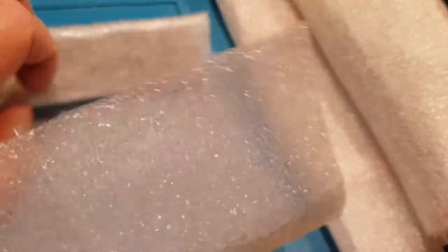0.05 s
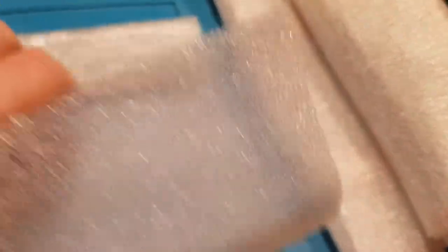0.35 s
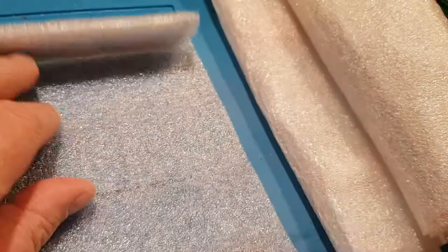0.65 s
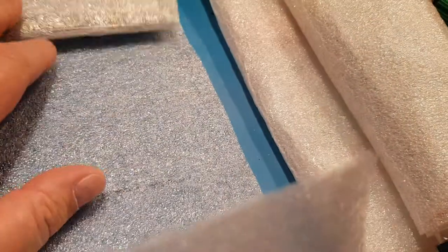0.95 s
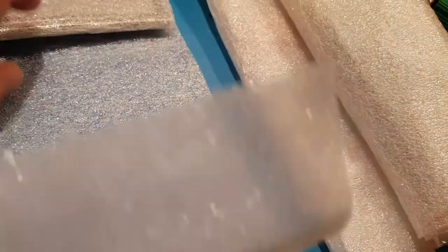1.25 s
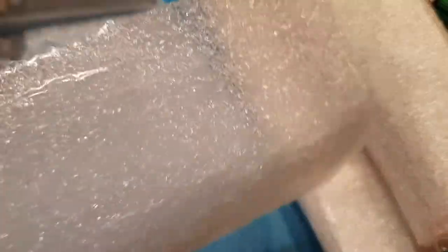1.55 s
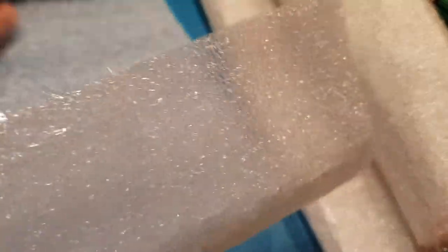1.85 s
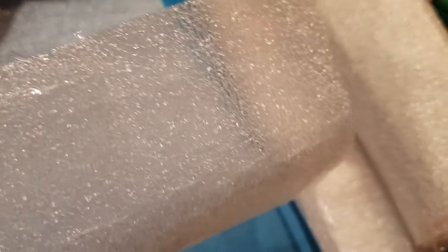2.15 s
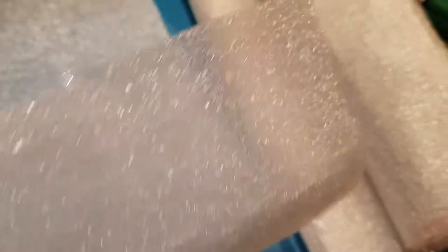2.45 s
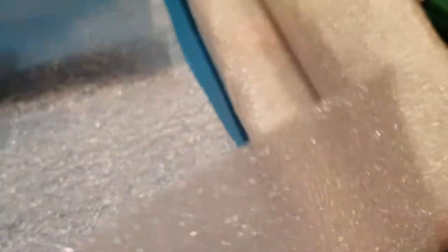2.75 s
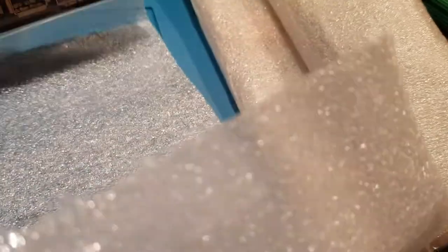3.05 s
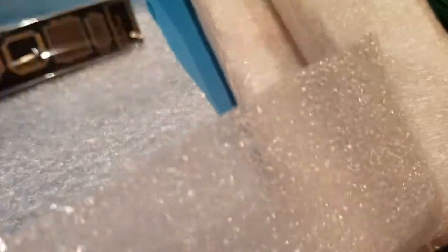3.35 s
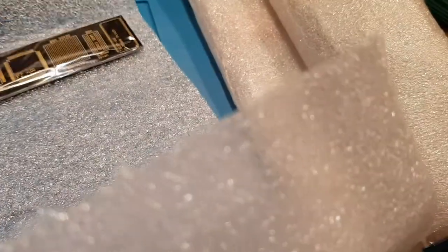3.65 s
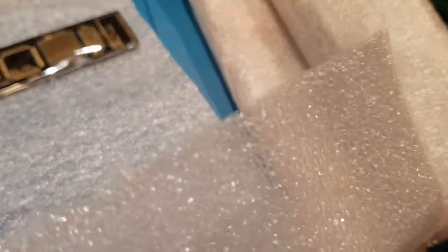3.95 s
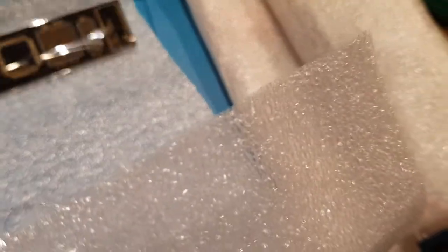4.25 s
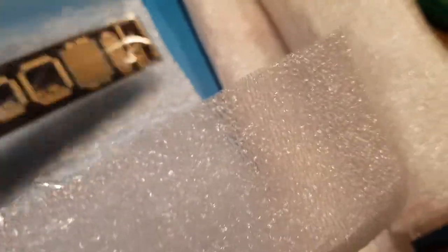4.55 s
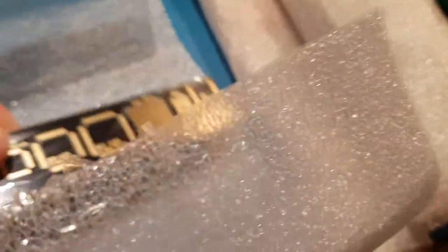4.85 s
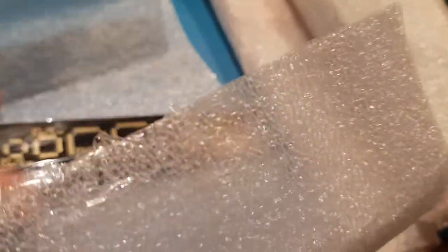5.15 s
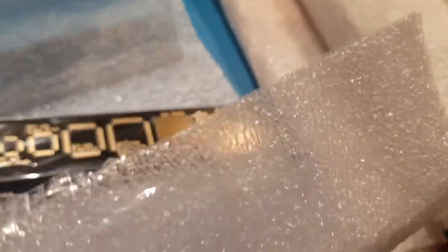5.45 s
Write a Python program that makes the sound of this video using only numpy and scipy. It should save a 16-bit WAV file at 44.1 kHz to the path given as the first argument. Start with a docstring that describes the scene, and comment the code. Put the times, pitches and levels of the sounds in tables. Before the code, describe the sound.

Thin foam packing sheets rustle, crinkle and snap close by as hands unwrap something, with soft bumps on a plastic box.

```python
"""A small quiet room, a two-port stereo microphone close to a plastic box. Hands slide thin foam sleeves
apart in it and lift out a wrapped circuit strip. From the start, foam cells catch and slip in strokes
of fine hiss while the sheets flex and squeak. A crease snaps sharply at 1 s. From 3.1 to 3.6 s the folds
scrunch hardest and soft bumps set the box booming. After a lull near 4.7 s come the last short strokes
and snaps, mostly on the left."""
import sys
import numpy as np
from scipy import signal
from scipy.fft import rfft, irfft, next_fast_len
from scipy.io import wavfile

SR = 44100
rng = np.random.default_rng(int(sys.argv[2]) if len(sys.argv) > 2 else 0)


def store_wav(level_fs):
    """Save 16-bit WAV to argv[1]."""
    pcm = np.round(np.clip(np.atleast_2d(level_fs), -1, 1) * 32767)
    wavfile.write(sys.argv[1], SR, pcm.T.astype(np.int16))


N = 251799
TIME = np.arange(N) / SR


# strokes of foam over foam: start/s, length/s, hiss/dB, top octave against the hiss/dB, flutter/dB
FOAM_STROKES = [(-0.01, 0.16, -47.5, -0.5, -58), (0.295, 0.14, -47.5, -0.5, -60),
                (0.502, 0.12, -47, -1, -62), (0.933, 0.077, -50.5, -6, -53.5),
                (1.108, 0.045, -46.5, 9, -68), (1.154, 0.159, -47, 2.5, -59),
                (1.397, 0.11, -47.5, -7, -56.5), (1.54, 0.078, -53.5, -1.0, -59),
                (1.696, 0.12, -51.5, 0.5, -53), (1.854, 0.039, -46, -0.5, -57.5),
                (1.941, 0.14, -46.5, 1, -60), (2.139, 0.077, -47.5, -3, -56),
                (2.243, 0.057, -50.5, -2, -45.5), (2.322, 0.15, -52.5, 2.5, -59.5),
                (2.477, 0.076, -54.5, 1, -58.5), (2.6, 0.079, -48.5, -4, -50), (2.716, 0.16, -53, 1, -61.5),
                (2.97, 0.19, -45, -2.5, -50.5), (3.189, 0.13, -44, -7, -51.5),
                (3.267, 0.22, -51.5, -10, -53.5), (3.506, 0.065, -59, 3, -53),
                (3.621, 0.03, -50.5, 0.5, -61), (3.708, 0.023, -49.5, 3, -55), (3.779, 0.13, -54, 4, -65),
                (3.962, 0.1, -51, 4, -67), (4.052, 0.066, -50, -3, -60), (4.145, 0.22, -54, 2, -58.5),
                (4.272, 0.11, -47.5, -13, -47.5), (4.492, 0.046, -63, 3.5, -66.5),
                (4.892, 0.028, -54, 8, -84), (4.946, 0.057, -55.5, 7, -86), (5.043, 0.022, -37, -1.5, -61),
                (5.131, 0.027, -51.5, 10, -80), (5.278, 0.11, -42.5, -5, -75),
                (5.419, 0.053, -50, 4.5, -61.5), (5.51, 0.061, -50.5, 2, -65), (5.645, 0.1, -59.5, 8, -61)]
# resting foam creeping between the strokes: t/s, hiss/dB
FOAM_CREEP = [(0.0, -51), (0.19, -59), (0.3, -54.5), (0.7, -53), (1.38, -52.5), (1.67, -60), (2.1, -57.5),
              (2.9, -54), (3.5, -52), (3.68, -66), (4.42, -61), (4.49, -73.5), (4.68, -66.5), (4.78, -78),
              (4.9, -56), (5.25, -57), (5.49, -66), (5.63, -68)]
def stroke_gains():
    """The strokes add their power to the creep: gains of hiss, finest cells and flutter."""
    hiss = fine = from_db(in_time(FOAM_CREEP)) ** 2
    flutter = 0
    for start, length, hiss_db, top_db, flutter_db in FOAM_STROKES:
        power = gesture(start, length)
        hiss = hiss + power * from_db(hiss_db) ** 2
        fine = fine + power * from_db(hiss_db + top_db) ** 2
        flutter = flutter + power * from_db(flutter_db) ** 2
    return np.sqrt([hiss, fine, flutter])


# spectrum of slipping cells, close up: f/Hz, level/dB
HISS_SPECTRUM = [(250, -46), (1000, -15), (1700, -12.5), (2400, -5), (3100, -5.5), (4300, 2), (5200, 1),
                 (6100, 1), (7300, 0), (9000, -3), (12000, 2), (14000, -2), (16000, -5.5)]
# where the rubbing sits in front of the microphone: t/s, left-right/dB
RUB_PLACE = [(0, 1), (1.0, 1.5), (1.18, 2), (1.4, 0), (2.4, 1.5), (3.1, 2.5), (3.9, 3), (4.35, 2.5),
             (4.55, 6.5), (4.85, 3.5), (5.25, 2.5), (5.71, 1)]
def sliding(hiss_gain, fine_gain):
    """Foam on foam: countless cells slip in a fine hiss, and now and then one ticks out of it."""
    cells = slips(per_s=6000, spread_db=2.5, life_s=.001, alike=.3)
    ticks = from_db(-12.5) * slips(per_s=150, spread_db=3.8, life_s=.0004, alike=.5)
    rubbing = near_wall(coloured(cells + ticks, HISS_SPECTRUM), share=.5, lag_s=.0008, sway=.25)
    coarse, fine = treble_split(patchy(rubbing, depth_db=2.5, rate=31))
    grip = from_db(1.5 * drift(9.2))  # the foam's hold wavers at random
    return (coarse * hiss_gain + fine * fine_gain) * grip * panned(in_time(RUB_PLACE))


# spectra of a rasping fold and of the flapping sheet: f/Hz, level/dB
RASP_SPECTRUM = [(200, -59), (900, -22), (1600, -11), (2700, 1.5), (4300, 4.5), (5400, 4.5), (6050, 4),
                 (7000, 2), (9300, 1.5), (11500, 7), (14500, 4.5), (16000, -20)]
FLAP_SPECTRUM = [(60, -32), (250, -6), (450, -5), (800, 4), (1200, 9), (1700, 1.5), (2600, -7.5),
                 (5000, -16)]
# crushed folds: peak t/s, rasp/dB, top octave against the rest/dB, flap/dB, fade/s, left-right/dB
CRUSHED_FOLDS = [(0.067, -46.5, 5, -49, 0.0049, 3), (0.13, -37.5, -6, -45.5, 0.0084, -2.5),
                 (0.32, -50, -3, -58, 0.014, 6), (0.572, -42.5, -11, -57, 0.017, 8.5),
                 (1.561, -45.5, 0, -46.5, 0.014, -1.5), (1.769, -50, 8, -45, 0.003, 15),
                 (1.816, -35.5, -6, -55, 0.0086, 1), (1.903, -43, 2, -50, 0.0041, 3),
                 (2.353, -38, -5, -44, 0.0045, -1), (2.959, -41, -22, -63, 0.012, -1),
                 (3.107, -29.5, -9, -40, 0.0071, 3.5), (3.338, -30.5, 5, -42, 0.003, 2.5),
                 (3.378, -28.5, -9, -35.5, 0.0051, 1), (3.403, -32.5, -10, -38, 0.0049, 6),
                 (3.417, -35, -10, -57, 0.0019, 13), (3.424, -33.5, -7.5, -40, 0.014, 0.5),
                 (3.578, -28, -7.5, -41.5, 0.0066, 5), (3.652, -48, -8, -65.5, 0.015, 4),
                 (3.744, -38.5, 3, -54, 0.0061, 3), (3.793, -49, -12, -47, 0.014, -1),
                 (4.032, -37, -4, -72, 0.0052, -5), (4.302, -45.5, 17, -66, 0.0057, 6),
                 (4.612, -57, -1, -69.5, 0.021, 7), (5.06, -46.5, 16, -70, 0.0087, 2.5)]
def scrunches(swell_s=.0027):
    """A fold gives way: slips crowd together, swell and die, and the sheet flaps."""
    fold_slips = slips(per_s=1700, spread_db=3.5, life_s=.00039, alike=.12)
    rasp, top = treble_split(coloured(fold_slips, RASP_SPECTRUM))
    flap = coloured(slips(per_s=1200, spread_db=2.2, life_s=.001, alike=.5), FLAP_SPECTRUM)
    out = np.zeros((2, N))
    for s, rasp_db, top_db, flap_db, fade_s, pan_db in CRUSHED_FOLDS:
        near = np.abs(TIME - s) < .15
        t = TIME[near] - s
        shape = np.exp(np.minimum(t / swell_s, -t / fade_s))
        grit = from_db(rasp_db) * (rasp[:, near] + from_db(top_db) * top[:, near])
        out[:, near] += shape * panned(pan_db) * (grit + from_db(flap_db) * flap[:, near])
    return out


# snapping creases: t/s, crack over 4 ms/dB, panel f/Hz, panel over 4 ms/dB, left-right/dB
CREASES = [(0.024, -52, 5430, -43, -7), (0.054, -40.5, 5770, -45, 0), (0.517, -43, 6200, -58, 2),
           (0.991, -25.5, 2730, -27.5, 0), (1.283, -51, 4650, -53, 1), (1.3, -56, 5210, -42, 1),
           (1.426, -36, 6380, -42.5, 5), (1.486, -37, 6260, -47, -2), (1.548, -42, 4460, -41, 2),
           (1.565, -46, 5260, -40.5, 9), (1.688, -50, 5020, -39.5, -3), (1.734, -38, 3880, -48, 1),
           (1.751, -29.5, 3720, -37.5, -1), (1.767, -41, 5200, -37, 5), (2.196, -40, 5150, -43, 1),
           (2.252, -37.5, 4010, -56, 3), (2.267, -48, 4570, -45, 6), (2.618, -37, 4300, -46, 1),
           (2.625, -44, 5630, -39.5, 1), (2.837, -55, 3500, -40, -3), (3.336, -38, 5330, -49, 6),
           (3.372, -33, 3700, -38, 5), (3.457, -37, 6120, -46, 0), (3.838, -34, 4600, -49, 5),
           (4.024, -42, 5600, -43, 8), (4.194, -44, 4500, -61, 1), (4.303, -35.5, 3830, -48, 9),
           (4.614, -45, 5000, -59, 3), (4.639, -50, 6500, -53, 3), (4.686, -52, 4700, -79, 11),
           (4.814, -56, 6500, -63, 10), (4.842, -45, 5370, -51.5, 6.5), (5.003, -33.5, 5450, -33.5, 6),
           (5.367, -42, 6030, -48, 9), (5.381, -32, 5500, -41, 6), (5.46, -31, 6100, -54, 10.5),
           (5.52, -48, 6300, -58, 8), (5.646, -39.5, 2830, -50.5, 4), (5.662, -37, 6200, -65, 15),
           (5.678, -34.5, 2820, -43.5, 7)]
def snaps(crack_s=.00034, scatter_s=.005, scatter_db=-21, kick_s=.0001, t60=.0076):
    """A crease flips: a dry crack, scattered by the layers around it, and the freed panel rings."""
    size = 2048
    t, out = TIME[:size], np.zeros((2, N + size))
    over_4_ms = np.sqrt(.004 * SR / size)
    shape = t / crack_s * np.exp(1 - t / crack_s) + from_db(scatter_db) * np.exp(-t / scatter_s)
    push = np.exp(-t / kick_s) + from_db(-26) * np.exp(-t / .01)
    for s, crack_db, hz, panel_db, pan_db in CREASES:
        crack = cut(rng.standard_normal((2, size)) * shape, 5000, "high")
        crack = from_db(crack_db) * np.array([rms_one(port) for port in crack])
        kick = rng.standard_normal(size) * push
        kick[0] += 3  # the flip itself, followed by the smaller slips it sets off
        # the panel has two close modes and a weaker overtone
        modes = ring(kick, hz, t60) - .61 * ring(kick, hz * .79, t60) - .48 * ring(kick, hz * 1.605, t60)
        panel = from_db(panel_db) * rms_one(cut(modes, 1700, "high"))
        at = int(s * SR)
        out[:, at:at + size] += crack * panned(pan_db) + panel * panned(pan_db / 2)
    return over_4_ms * out[:, :N]


# modes of the plastic box: f/Hz, relative level/dB, t60/s
BOX_MODES = [(67, -43, 0.091), (121.4, 0.5, 0.082), (145, -3, 0.27), (183.7, -8.5, 0.35),
             (215, -4.5, 0.083), (252.5, -8.5, 0.15), (301.8, -19.5, 0.52), (401, -8.5, 0.057)]
# soft bumps on the box: t/s, boom drive/dB, knock drive/dB
BOX_BUMPS = [(0.130, -42, -57), (0.315, -48, -59), (0.352, -45, -72), (0.392, -49, -72), (1.565, -52, -63),
             (1.814, -50, -39), (2.09, -50, -60), (2.422, -48, -48), (2.614, -49, -66), (3.268, -48, -56),
             (3.339, -36, -46), (3.368, -38, -46), (3.401, -43, -41), (3.425, -46, -46), (3.738, -42, -60),
             (3.788, -54, -49), (4.801, -56, -61), (4.920, -43, -55), (5.053, -43, -62), (5.688, -51, -56)]
def bumps(push_s=.002, knock_s=.0092, wall_hz=390, wall_t60=.043):
    """Padded blows ring each mode of the box with its own strength, under a dull knock of the wall."""
    times, boom_db, knock_db = np.transpose(BOX_BUMPS)
    at = (times * SR).astype(int)
    boom, force = np.zeros(N), np.zeros(N)
    for hz, mode_db, t60 in BOX_MODES:
        blow_db = boom_db + mode_db + rng.normal(-2, 1, len(at))
        blows = np.zeros(N)
        blows[at] = from_db(blow_db) * rng.choice([-1, 1], len(at))
        boom += ring(blows, hz, t60)
    force[at] = from_db(knock_db)
    wall = from_db(2) * ring(force, wall_hz, wall_t60)
    contact = signal.lfilter([1], [1, -np.exp(-1 / (knock_s * SR))], force + 1e-18)
    dull_noise = cut(cut(stereo_noise(alike=.12), 940, "low"), 200, "high")
    body = cut(boom, 1 / push_s, "low") + wall
    return cut(body, 81, "high") + contact * rms_one(dull_noise)  # a small box radiates little deep bass


# resonances driven by the rubbing: taut patches of foam that squeak, the hollow box humming near 434 Hz at
# 0.869 s and 4.099 s, and a brief flap of a sheet at 1.768 s: peak t/s, f/Hz, bandwidth/Hz, level/dB, half
# length/s
RUBBED_RESONANCES = [(0.063, 920, 200, -60, 0.022), (0.404, 4360, 400, -48, 0.021), (0.869, 433, 40, -71, 0.08),
                     (1.002, 2500, 900, -48, .018), (1.222, 1740, 600, -55, 0.1), (1.48, 1033, 222, -50, 0.025),
                     (1.768, 1100, 880, -45, 0.0041), (2.046, 1280, 402, -55, 0.069),
                     (2.276, 1100, 500, -47, 0.015), (2.353, 3000, 900, -45, 0.011),
                     (2.66, 1900, 400, -49.5, 0.018), (2.84, 3380, 400, -50, 0.011),
                     (3.052, 830, 250, -53, 0.027), (3.105, 5830, 383, -34.5, 0.014),
                     (3.454, 5900, 500, -50, 0.015), (4.099, 435, 40, -63.5, 0.051),
                     (4.352, 520, 160, -57.5, 0.039), (5.002, 5930, 1200, -41, 0.015)]
def squeaks():
    """Slips drive one resonance, of a foam patch, the hollow box or a flapping sheet, while the rub swells and
    fades."""
    out, size = np.zeros((2, N)), 8192
    for s, hz, width_hz, level_db, half_s in RUBBED_RESONANCES:
        start = max(int(s * SR) - size // 2, 0)
        t = TIME[start:start + size] - s
        band = signal.butter(2, [hz - width_hz / 2, hz + width_hz / 2], "band", fs=SR, output="sos")
        tones = signal.sosfilt(band, rng.standard_normal((3, size)))
        squeak = rms_one(tones[0] + .5 * tones[1:])  # one part shared, one for each port
        out[:, start:start + size] += from_db(level_db) * np.exp(-(t / half_s) ** 2) * squeak
    return out


# spectrum of a fluttering sheet: f/Hz, level/dB
FLUTTER_SPECTRUM = [(150, -25), (500, -15), (900, -4), (1300, -0.5), (1800, -0.5), (2400, -3), (3200, -2.5),
                    (5000, -7.5)]
def fluttering(gain):
    """Whole sheets bend and flutter in coarser slips, next to the wall of the box."""
    flutter = coloured(slips(per_s=700, spread_db=4, life_s=.0033, alike=.25), FLUTTER_SPECTRUM)
    reflected = near_wall(flutter, share=.6, lag_s=.0015, sway=.3)
    return gain * patchy(reflected, depth_db=3, rate=15)


# spectrum of a dragging finger: f/Hz, level/dB
DRAG_SPECTRUM = [(70, -24), (220, -11.5), (400, -2.5), (600, -4), (800, -4), (1100, -16), (2000, -50)]
# finger drags: start/s, length/s, level/dB
FINGER_DRAGS = [(0.0, 0.15, -78), (0.934, 0.11, -71.5), (1.423, .17, -63.5), (1.72, 0.18, -62),
                (1.977, 0.77, -72.5), (2.608, .09, -62), (2.931, 0.19, -58), (3.253, 0.19, -54.5),
                (3.483, 0.1, -63), (3.707, 0.025, -59), (3.768, 0.04, -52), (3.856, 0.046, -64),
                (3.977, 0.2, -65), (4.285, 0.14, -60.5), (4.493, 0.16, -77), (5.041, .05, -62),
                (5.677, .035, -59.5)]
def dragging():
    """Fingers catch and slip over the sheets in a dull rub, dead centre."""
    rub = coloured(slips(per_s=370, spread_db=6, life_s=.001, alike=1), DRAG_SPECTRUM)
    power = sum(gesture(start, length) * from_db(db) ** 2 for start, length, db in FINGER_DRAGS)
    return rub * np.sqrt(power)


# spectrum of the handling rumble: f/Hz, level/dB
RUMBLE_SPECTRUM = [(25, -16), (60, 7), (110, -1.5), (145, 2.5), (200, 2.5), (300, 0), (420, -16),
                   (600, -12), (1100, -51)]
# the hands leaning on the box: t/s, drive/dB
HAND_WEIGHT = [(0.0, -64), (0.6, -71.5), (1.03, -64), (1.37, -69), (1.56, -60.5), (1.72, -68),
               (1.85, -63.5), (2.35, -60.5), (3.03, -56.5), (3.2, -62.5), (3.35, -47), (3.59, -60.5),
               (4.02, -64), (4.36, -64), (4.7, -75), (5.05, -66), (5.71, -69.5)]
def leaning():
    """The shifting weight of the hands rumbles and keeps the modes of the box stirring."""
    push = stereo_noise(alike=.99)
    modes = sum(from_db(db) * ring(push, hz, t60) / np.sqrt(t60) for hz, db, t60 in BOX_MODES)
    stirring = from_db(-4) * rms_one(cut(modes, 59, "high"))
    rumble = from_db(-5.5) * coloured(stereo_noise(alike=.98), RUMBLE_SPECTRUM)
    return from_db(in_time(HAND_WEIGHT)) * (stirring + rumble)


def near_wall(x, share, lag_s, sway):
    """A nearby box wall returns the rubbing; delay and colour sway as the sheet moves."""
    lags = [lag_s * np.exp(sway * drift(2.06)) for port in x]
    echo = np.array([np.interp(TIME - lag, TIME, port) for port, lag in zip(x, lags)])
    return (x + share * echo) / np.hypot(1, share)


def room(x, t60=.2):
    """The small room answers with a short, dull tail: six feedback delays a side."""
    out, x = np.zeros((2, N)), cut(x, 4100, "low")
    for k, lag in enumerate((rng.uniform(.007, .035, 12) * SR).astype(int)):
        loop, gain = x[k % 2].copy(), from_db(-60 * lag / SR / t60)
        for i in range(lag, N, lag):
            loop[i:i + lag] += gain * loop[i - lag:i][:N - i]
        out[k % 2] += (loop - x[k % 2]) * (-1) ** (k // 2)
    return out / np.sqrt(6)


# a low drone in the room: t/s, level/dB
DRONE_LEVEL = [(0, -67), (1.35, -66.5), (1.6, -104), (5.71, -85)]
# spectra of the drone and of the room tone: f/Hz, level/dB
DRONE_SPECTRUM = [(25, -16), (50, -13), (72, 6.5), (95, -5), (160, -30), (600, -60)]
ROOM_SPECTRUM = [(22, -17), (45, -7), (70, 2), (100, -5.5), (140, 1.5), (200, -4.5), (310, -28), (400, -30),
                 (600, -20), (1000, -26.5), (1600, -23), (3000, -33), (16000, -23.5)]
def still_air(hum_hz=300):
    """Faint room tone all around, a thin hum and a low drone that sinks away near 1.5 s."""
    drone = from_db(in_time(DRONE_LEVEL)) * coloured(stereo_noise(alike=.99), DRONE_SPECTRUM)
    hum = from_db(-73) * np.sin(2 * np.pi * hum_hz * TIME + 1.1 * drift(1))
    return drone + hum + from_db(-72) * coloured(stereo_noise(alike=0), ROOM_SPECTRUM)


def gesture(start, length, attack_s=.026, release_s=.031, arch_db=1.66):
    """Power of one hand movement: it gathers speed, is fastest halfway and coasts to rest."""
    t = TIME - start
    attack = np.clip(t / attack_s, 0, 1)
    arch = from_db(-arch_db * (2 * np.clip(t / length, 0, 1) - 1) ** 2)
    release = np.exp(-np.clip(t - length, 0, 1) / release_s)
    return (attack * arch * release) ** 2


def slips(per_s, spread_db, life_s, alike):
    """Stick-slip grains: tiny noise bursts of very unequal size that swell and die at random moments."""
    born = rng.random(N) < per_s / SR
    energy = born * from_db(spread_db * np.minimum(rng.exponential(1, N), 4)) ** 2
    r = np.exp(-2 / (life_s * SR))
    power = signal.lfilter([1], [1, -2 * r, r * r], energy + 1e-18)
    return rms_one(np.sqrt(power) * stereo_noise(alike))


def patchy(x, depth_db, rate):
    """As the sheet bends, its loose panels favour now one band, now another."""
    out = 0
    for hz in np.geomspace(500, 13000, 14):
        below = signal.sosfiltfilt(signal.butter(4, hz, fs=SR, output="sos"), x)
        out = out + below * from_db(depth_db * drift(rate))
        x = x - below
    return out + x


def ring(x, hz, t60):
    """One mode: a unit click sets a sine of height 1 ringing."""
    r, w = from_db(-60 / (t60 * SR)), 2 * np.pi * hz / SR
    return signal.lfilter([0, np.sin(w)], [1, -2 * r * np.cos(w), r * r], x + 1e-18)


def drift(rate):
    """A random wander with spread 1, slower than about rate Hz."""
    hop = 40
    r = np.exp(-2 * np.pi * rate * hop / SR)
    slow = signal.lfilter([1], [1, -2 * r, r * r], rng.standard_normal(N // hop + 2002))[2000:]
    return np.interp(np.arange(N) / hop, np.arange(len(slow)), rms_one(slow))


def stereo_noise(alike):
    """White noise, partly shared by the two ports."""
    mid, side = rng.standard_normal((2, N))
    return np.sqrt(1 + alike) * mid + np.sqrt(1 - alike) * side * [[1], [-1]]


def coloured(x, spectrum):
    """Give a steady sound a spectrum; its mid channel has rms 1."""
    size = next_fast_len(N)
    gain = from_db(at_hz(spectrum, np.fft.rfftfreq(size, 1 / SR)))
    y = irfft(rfft(x, size) * gain, size)[:, :N]
    return y / np.std(y.mean(axis=0))


def treble_split(x):
    """What lies below 8 kHz, and the top octave above it."""
    below = signal.sosfiltfilt(signal.butter(3, 8000, fs=SR, output="sos"), x)
    return below, x - below


def cut(x, hz, kind):
    """Second-order high- or low-pass."""
    return signal.sosfilt(signal.butter(2, hz, kind, fs=SR, output="sos"), x + 1e-18)


def in_time(curve):
    """Read a curve at every sample."""
    return np.interp(TIME, *np.transpose(curve))


def at_hz(points, hz):
    """Read a spectrum on a log-frequency axis."""
    f, value = np.transpose(points)
    return np.interp(np.log(hz + 1e-9), np.log(f), value)


def panned(db):
    """Left and right gains for a level difference."""
    return from_db(np.array([[.5], [-.5]]) * db)


def from_db(db):
    """Decibels to gain."""
    return 10 ** (np.asarray(db) / 20)


def rms_one(x):
    """Scale to rms 1."""
    return x / np.sqrt(np.mean(x ** 2) + 1e-20)


def scene():
    """The handling close up, its room tail behind it and the still air all around."""
    hiss, fine, flutter = stroke_gains()
    foam = sliding(hiss, fine) + fluttering(flutter) + dragging() + scrunches() + squeaks() + snaps()
    handling = foam + bumps() + leaning()
    return handling + from_db(-10) * room(handling) + still_air()


# colour of one microphone port against the other: f/Hz, left-right/dB
PORT_BALANCE = [(60, 1), (200, 3.5), (380, 0), (700, 7.5), (1300, -0.5), (2400, 1.5), (4400, -6.5),
                (8000, 1), (15000, 1.8)]
def record(dry):
    """The microphone: each port has its own colour, the left is nearer, and the top is cut steeply."""
    right_lag_s, cutoff_hz = .000316, 15900
    size = next_fast_len(N + 2048)
    hz = np.fft.rfftfreq(size, 1 / SR)
    arrival = np.exp(-2j * np.pi * hz * np.array([[0], [right_lag_s]]))
    heard = irfft(rfft(dry, size) * panned(at_hz(PORT_BALANCE, hz)) * arrival, size)[:, :N]
    return signal.sosfilt(signal.ellip(10, .2, 70, cutoff_hz, fs=SR, output="sos"), heard)


dry = scene()
out = record(dry)
store_wav(out)
```